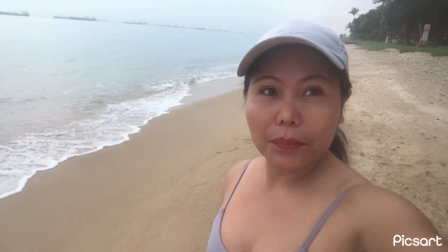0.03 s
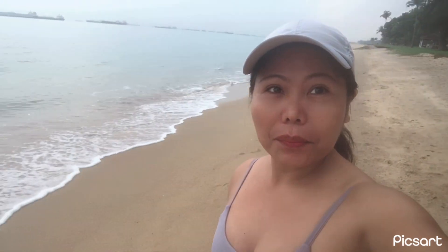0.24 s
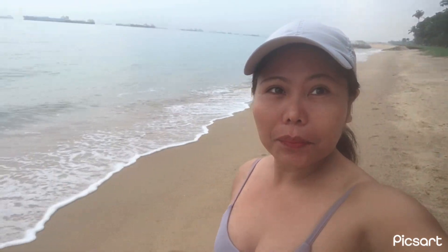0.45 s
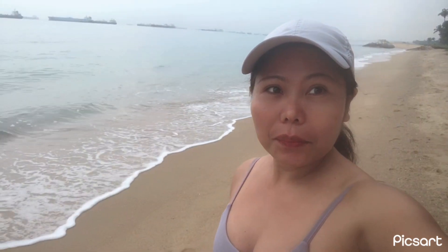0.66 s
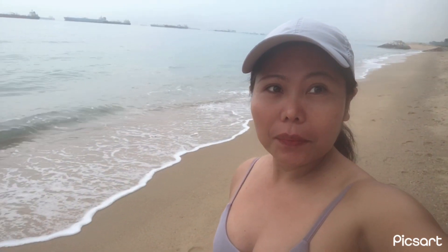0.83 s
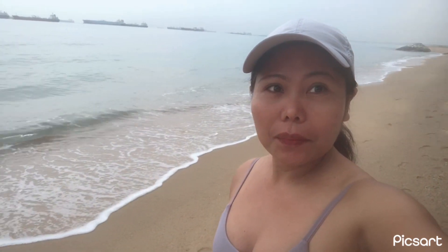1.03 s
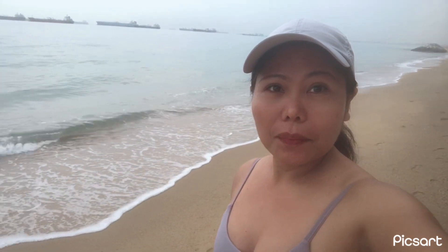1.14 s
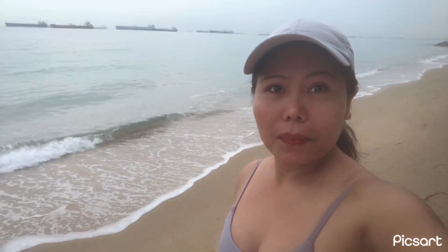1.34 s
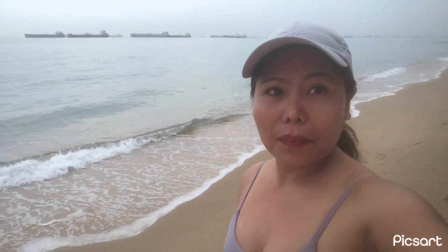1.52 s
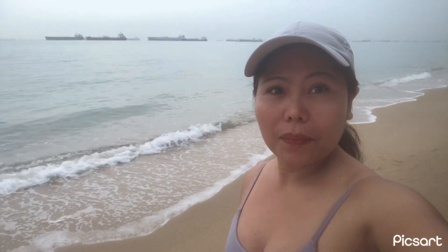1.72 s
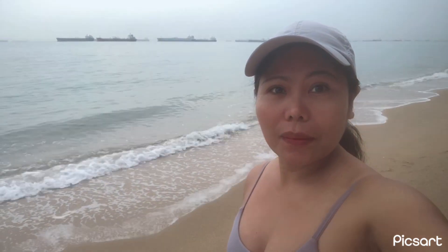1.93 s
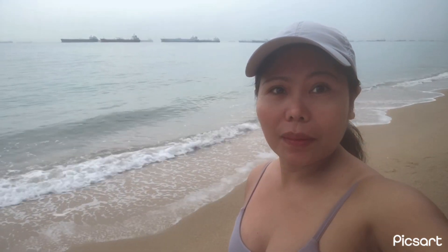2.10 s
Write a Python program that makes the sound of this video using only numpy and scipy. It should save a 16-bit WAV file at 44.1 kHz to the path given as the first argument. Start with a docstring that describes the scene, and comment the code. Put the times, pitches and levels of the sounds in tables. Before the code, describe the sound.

A small wave breaks and washes up a sandy beach, with bubbling churn and hissing spray

```python
"""A small wave curls, breaks and washes up a sandy beach, heard from close by, alike in both channels.
From the start old foam fizzes (short damped sines in patchy noise) over a low breeze (filtered noise).
As the crest tips over, spray ticks (noise puffs) and hisses, and bubbles (damped sines) churn in the water.
The wash is loudest near 1.2 s; big bubbles gurgle just behind it and plops (a sine with a noise slap)
stand out before, during and after; then the churn and the spray die down."""
import sys
import numpy as np
from scipy import signal
from scipy.fft import rfft, irfft, next_fast_len
from scipy.io import wavfile
from scipy.ndimage import uniform_filter1d, map_coordinates

SR = 44100
rng = np.random.default_rng(int(sys.argv[2]) if len(sys.argv) > 2 else 0)


def to_wav(sig):
    """Store sig (one row per channel, or 1-D mono) as 16-bit WAV at the path in sys.argv[1].

    Samples outside -1..1 are clipped; the rate is SR.
    """
    pcm = np.clip(np.atleast_2d(sig), -1, 1) * 32767
    pcm = np.round(pcm).astype(np.int16)
    wavfile.write(sys.argv[1], SR, pcm.T)  # frames by channels


N = 95520  # length in samples
T = np.arange(N) / SR  # time in s
LN_60_DB = np.log(1000)  # a fall of 60 dB, in nepers


def amp(db):
    """Level law: decibels to amplitude gain."""
    return 10 ** (np.asarray(db) / 20)


def unit(x):
    """Normalisation: scale to rms 1."""
    return x / np.sqrt(np.mean(x ** 2) + 1e-20)


def curve(rows, lag=0):
    """Envelope: (t/s, value) points joined by straight lines, delayed by lag/s."""
    times, values = np.transpose(rows)
    return np.interp(T - lag, times, values)


def wobble(rate):
    """Random modulation: a smooth curve through rate random knots a second."""
    knots = rng.standard_normal(400)
    return map_coordinates(knots, [T * rate], mode="wrap")


def filtered(x, response):
    """Linear filtering: multiply the spectrum of x by a response of f/Hz."""
    size = next_fast_len(len(x) + 8192)
    hz = np.fft.rfftfreq(size, 1 / SR)
    return irfft(rfft(x, size) * response(hz), size)[:len(x)]


def coloured(x, spectrum):
    """Spectral shaping: filter x by (f/Hz, level/dB) points on a log frequency axis, to rms 1."""
    f, db = np.transpose(spectrum)

    def response(hz):
        return amp(np.interp(np.log(hz + 1), np.log(f), db))
    return unit(filtered(x, response))


def rush(patchy_db):
    """Turbulence: white noise with smooth patches of random gain (rms patchy_db) in time and frequency."""
    z = signal.stft(rng.standard_normal(N), nperseg=512)[2]
    field = uniform_filter1d(rng.standard_normal(z.shape), 6, 0)  # across frequency
    field = uniform_filter1d(field, 8, 1)  # across time
    patchy = z * amp(patchy_db * unit(field))
    return unit(signal.istft(patchy, nperseg=512)[1][:N])


def bubbles(low_hz, high_hz, cycles, spread_db, rise, count, size):
    """Bubble resonance: a cloud of damped sines, each rising in pitch as its bubble nears the surface."""
    when, pitch, strength, life = rng.random((count, 4)).T[:, :, None]
    hz = low_hz + (high_hz - low_hz) * pitch
    t = np.arange(size) / SR
    t60 = cycles * (.5 + life) / hz
    age = np.minimum(t / t60, 2)
    excess = np.minimum(-np.log(1 - strength), 4)  # a few bubbles are much stronger than most
    gain = amp(spread_db * excess) * np.sqrt(hz)
    ring = gain * np.exp(-LN_60_DB * age) * np.sin(2 * np.pi * hz * t * (1 + rise * age / 2))
    at = (when * N).astype(int) + np.arange(size)
    cloud = np.bincount(at.ravel(), ring.ravel(), N)[:N]
    return unit(cloud - cloud.mean())


def burst(hz, width_oct, t60, t):
    """Impact noise: an exponentially dying puff of noise around hz, peak 1."""
    puff = rng.standard_normal(len(t)) * np.exp(-LN_60_DB * t / t60)
    puff = filtered(puff, lambda f: np.exp(-(np.log2((f + 1) / hz) / width_oct) ** 2))
    return puff / np.abs(puff).max()


def add(track, s, sound):
    """Superposition: mix a short sound in at time s."""
    part = track[round(s * SR):][:len(sound)]
    part += sound[:len(part)]


# Strength of the breaker, which also drives the gurgle: t/s, level/dB
BREAKER_LEVEL = [(0, -59), (.45, -40.5), (.6, -34.5), (.7, -30), (.8, -30), (.95, -25), (1.07, -24.5),
                 (1.17, -21.5), (1.36, -23.5), (1.58, -26), (1.88, -28), (2.17, -32)]
# Filter of the churning water: f/Hz, relative level/dB
CHURN_SPECTRUM = [(200, -33), (600, -12), (1100, -6), (1450, -2), (2050, 1), (2800, -3), (3500, -12.5),
                  (4400, -3), (8000, -35)]


def churn():
    """Bubble resonance: millimetre bubbles ring in the breaking crest, over the rush of the water."""
    cloud = bubbles(low_hz=1205, high_hz=3606, cycles=22, spread_db=1.5, rise=0.047, count=4800, size=1200)
    water = cloud + amp(4.5) * rush(patchy_db=1.2)
    return coloured(water, CHURN_SPECTRUM) * amp(curve(BREAKER_LEVEL))


# Filter of the large air pockets: f/Hz, relative level/dB
GURGLE_SPECTRUM = [(60, -20), (150, -3), (280, -2), (500, 0.5), (800, -1.5), (1300, 2.5), (2200, -35),
                   (5000, -40)]
# big bubbles follow the plunge and gain on the churn as the wave rolls on
GURGLE_LAG_S, PLUNGE_S = 0.055, 1.2
GURGLE_AT_PLUNGE_DB, GURGLE_GROWS_DB_PER_S = -6, 3


def gurgle():
    """Size and pitch: large pockets of air, ringing lower and longer, come up behind the crest."""
    cloud = bubbles(low_hz=181.4, high_hz=1458, cycles=8.9, spread_db=1.0, rise=0.1, count=1600, size=2000)
    water = coloured(cloud + amp(5) * rush(patchy_db=1), GURGLE_SPECTRUM)
    relative_db = GURGLE_AT_PLUNGE_DB + GURGLE_GROWS_DB_PER_S * (T - PLUNGE_S)
    return water * amp(curve(BREAKER_LEVEL, GURGLE_LAG_S) + relative_db)


# Strength of the spray thrown by the crest, before its flutter: t/s, level/dB
SPRAY_LEVEL = [(0, -47), (.48, -45.5), (.62, -37), (.7, -33.5), (.83, -30.5), (.94, -25), (1.07, -27),
               (1.2, -24), (1.42, -26.5), (1.6, -29), (1.9, -32.5), (2.17, -39)]
# Filter of the spray: f/Hz, relative level/dB
HISS_SPECTRUM = [(1500, -19), (3000, 4), (3600, 2.5), (4400, -6.5), (5200, 0), (6500, 0.5), (9500, -1),
                 (11000, -3), (13200, -3.5), (14300, -11), (15500, -40)]


def spray():
    """Superposed transients: fine drops and bursting foam hiss and flutter above the crest."""
    fizz = bubbles(low_hz=2880, high_hz=15000, cycles=4.7, spread_db=3.5, rise=.05, count=14000, size=128)
    hiss = coloured(fizz + amp(6.5) * rush(patchy_db=0.6), HISS_SPECTRUM)
    flutter_db = 0.76 * wobble(69.15)
    return hiss * amp(curve(SPRAY_LEVEL) + flutter_db)


# Single splashes and large bubbles: t/s, peak level of the ring/dB, starting f/Hz, t60/s
PLOP_EVENTS = [(.323, -25.5, 760, .02), (.8445, -17, 3500, .005), (.936, -15, 1900, .007),
               (1.0008, -6.5, 2100, .0045), (1.5297, -7.3, 1280, .009), (1.596, -20.5, 560, .016)]
# Drops of spray landing close by: t/s, peak level/dB, centre f/Hz
TICK_EVENTS = [(.6818, -13.5, 9000), (.7062, -13, 7300), (.9186, -11, 7600)]
PLOP_ATTACK_S, PLOP_RISE = .0003, .1  # the pitch rises by this fraction within the t60
SLAP_DB, SLAP_WIDTH_OCT = -9, 1.6  # slap level relative to the ring
TICK_T60_S, TICK_WIDTH_OCT = .005, .5


def splashes():
    """Impact and resonance: plops (a slap of water and its trapped bubble) and ticks of spray stand out."""
    out = np.zeros(N)
    t = np.arange(2048) / SR
    for s, db, hz, t60 in PLOP_EVENTS:
        ring = np.sin(2 * np.pi * hz * t * (1 + PLOP_RISE * np.minimum(t / t60, 1) / 2))
        ring = ring * np.exp(-LN_60_DB * t / t60) * (1 - np.exp(-t / PLOP_ATTACK_S))
        ring = ring / np.abs(ring).max()
        slap = amp(SLAP_DB) * burst(hz, SLAP_WIDTH_OCT, t60, t)
        add(out, s, amp(db) * (ring + slap))
    for s, db, hz in TICK_EVENTS:
        add(out, s, amp(db) * burst(hz, TICK_WIDTH_OCT, TICK_T60_S, t))
    return out


# Filter of the old foam and distant surf: f/Hz, relative level/dB
FOAM_SPECTRUM = [(20, -40), (150, -7), (300, -4), (500, -4), (750, -0.5), (1000, -1), (1800, 0.5),
                 (2700, -2.5), (3500, -9), (4500, -14), (7000, -11), (10000, -11.3), (13500, -13),
                 (15000, -16)]
FOAM_DB = -35.5


def foam():
    """Stationary noise: the last wave's foam and the surf further along the shore keep a near-even level."""
    fizz = bubbles(low_hz=513, high_hz=13100, cycles=16.6, spread_db=1.5, rise=0.15, count=9000, size=400)
    wash = coloured(fizz + amp(11) * rush(patchy_db=1.0), FOAM_SPECTRUM)
    return wash * amp(FOAM_DB + 0.15 * wobble(26))


# Strength of the breeze: t/s, level/dB
BREEZE_LEVEL = [(0, -30.5), (.5, -30.5), (.93, -29), (1.2, -30.5), (1.5, -31.5), (1.92, -29), (2.17, -32)]
# Filter of the wind noise: f/Hz, relative level/dB
RUMBLE_SPECTRUM = [(15, -48), (28, -28), (38, -7.5), (56, -5), (70, -1.5), (95, -3), (115, -8.5),
                   (160, -12.5), (220, -20.5), (320, -28), (800, -65)]


def wind():
    """Low-frequency flow noise: a light breeze rumbles on the microphone."""
    return coloured(rng.standard_normal(N), RUMBLE_SPECTRUM) * amp(curve(BREEZE_LEVEL))


def scene():
    """Superposition: all sources add and reach both channels alike."""
    beach = churn() + gurgle() + spray() + splashes() + foam() + wind()
    return np.array([beach, beach])


LOW_CUT_HZ, TOP_HZ = 26, 14950  # half amplitude at the low cut, nothing from the top upwards


def record(dry):
    """Band limitation: a gradual low cut and a sharp upper limit."""
    def response(hz):
        low_cut = hz ** 4 / (hz ** 4 + LOW_CUT_HZ ** 4)
        return (hz < TOP_HZ) * low_cut
    return np.array([filtered(side, response) for side in dry])


dry = scene()
out = record(dry)
to_wav(out)
```